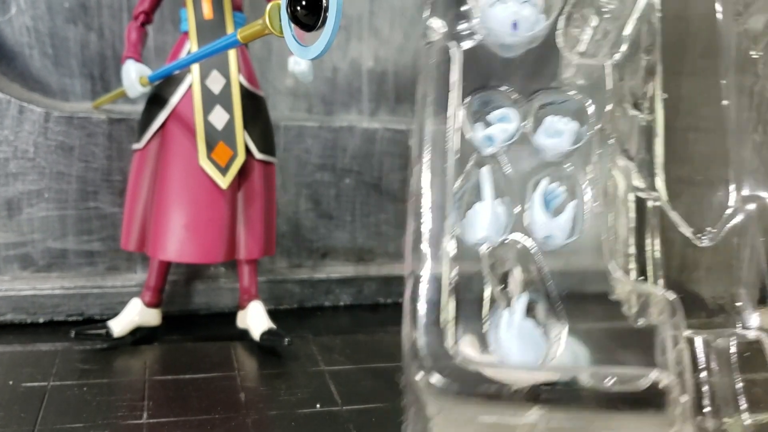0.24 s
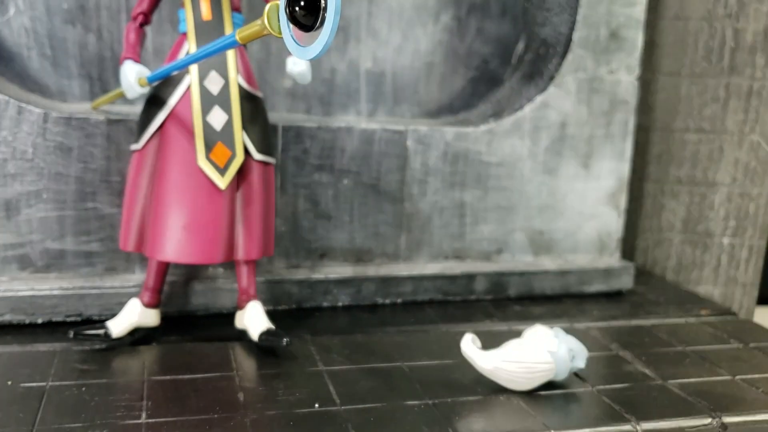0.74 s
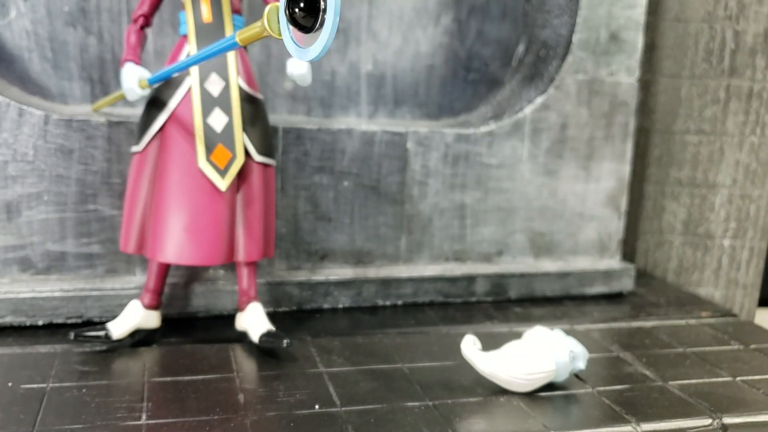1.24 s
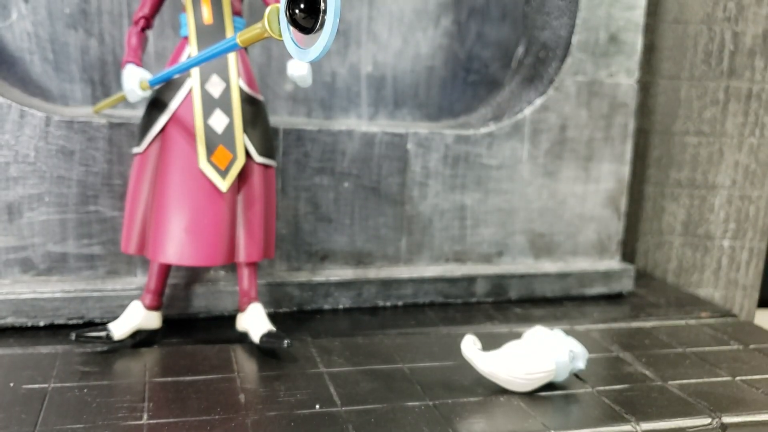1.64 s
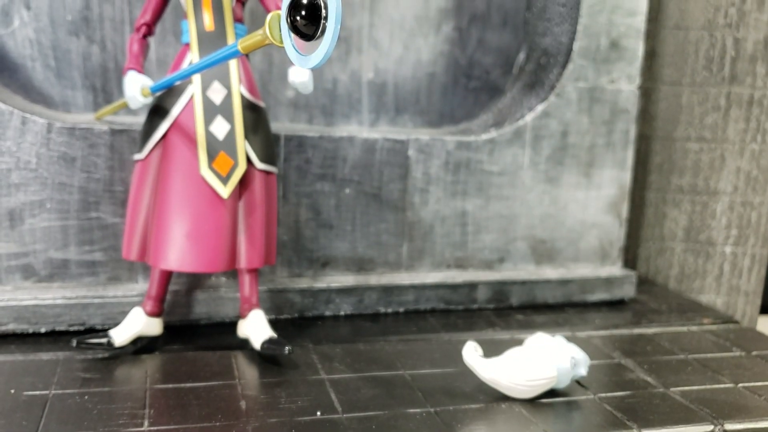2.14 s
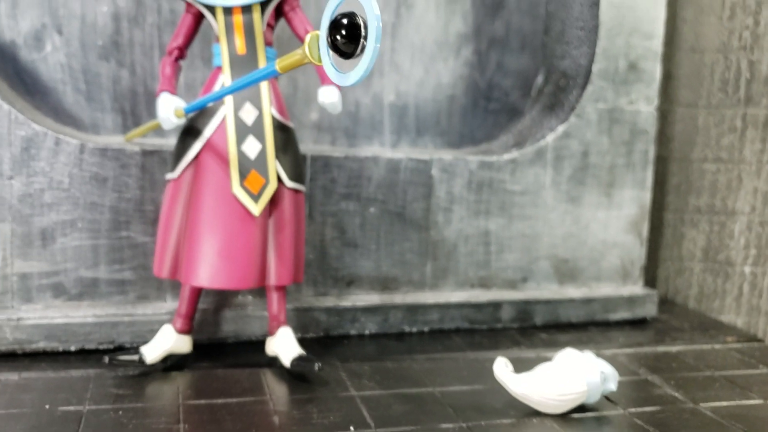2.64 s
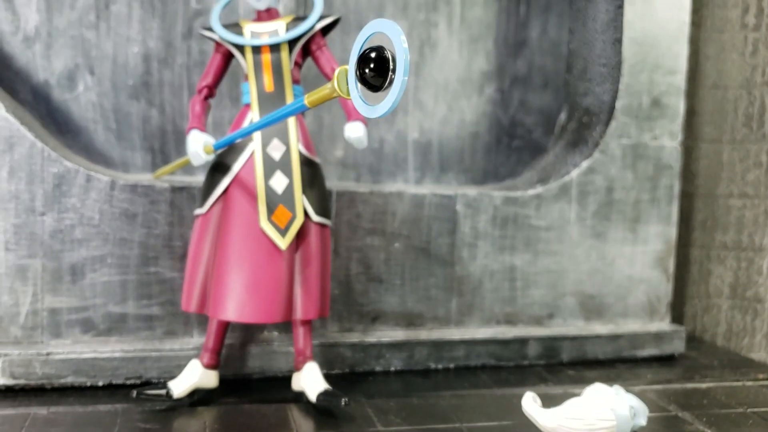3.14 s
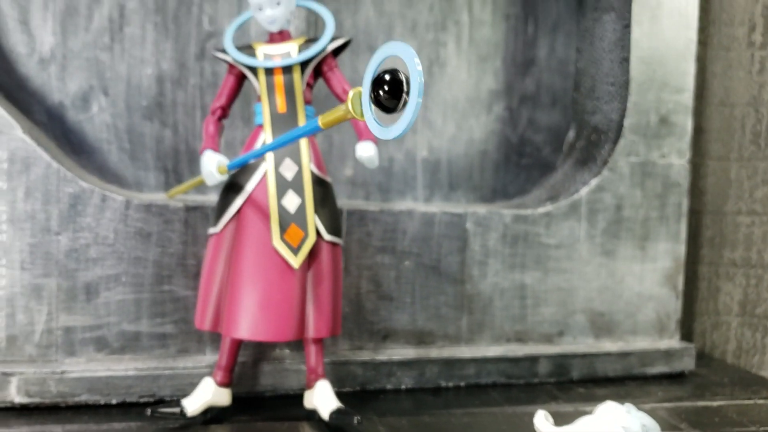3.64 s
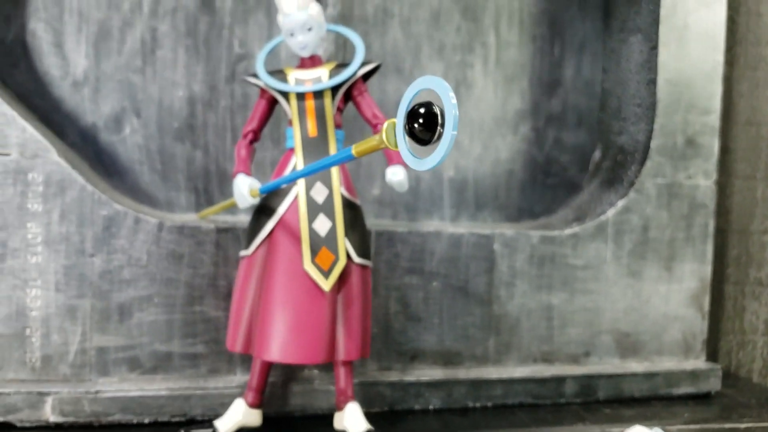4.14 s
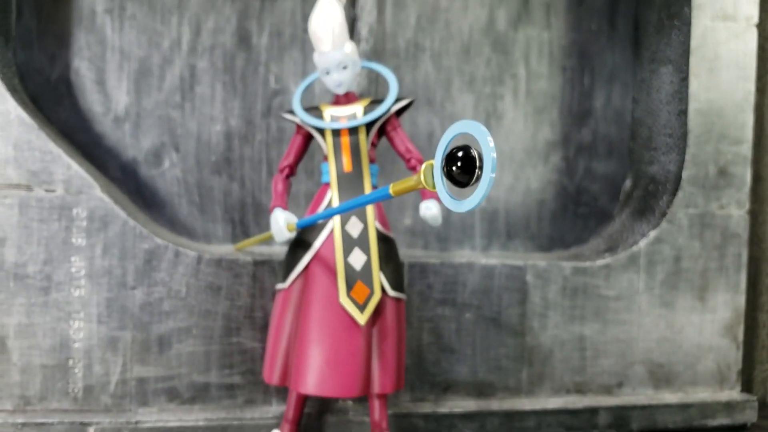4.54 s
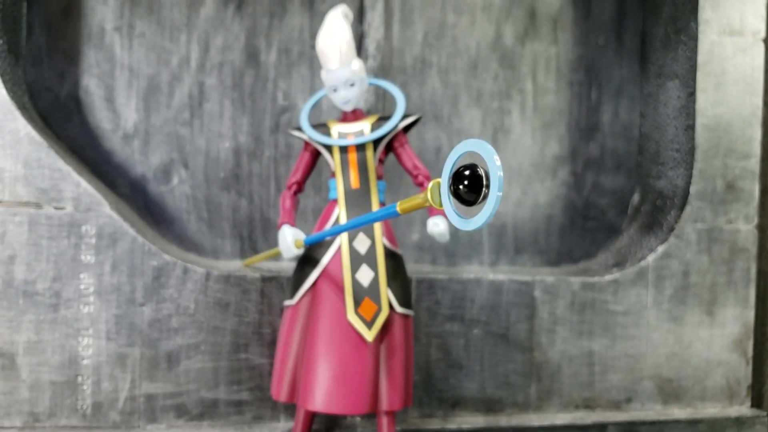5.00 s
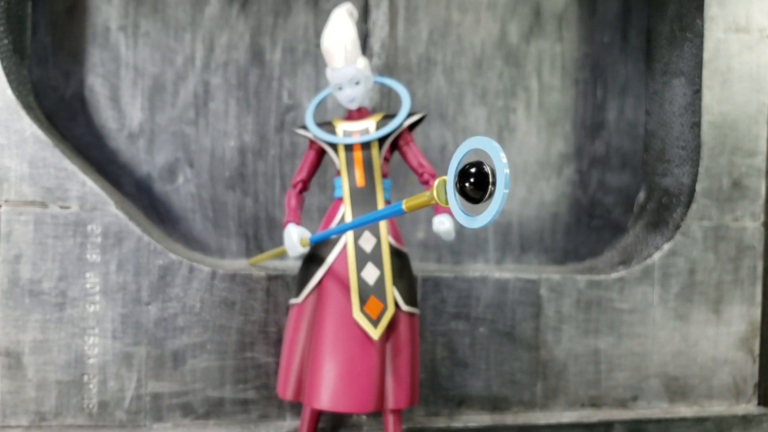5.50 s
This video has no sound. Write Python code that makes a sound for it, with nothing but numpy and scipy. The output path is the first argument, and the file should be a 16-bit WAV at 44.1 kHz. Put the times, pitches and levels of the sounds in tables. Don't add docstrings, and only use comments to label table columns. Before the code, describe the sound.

A quiet small furnished room with low house hum and soft microphone hiss. From about 0.2 s a thin plastic tray on the table, to the right, gives faint ticks, with small crackles near 0.7 and 0.9 s. Between 1.15 and 1.9 s it buckles in a dense, irregular run of bright pops and crinkles with light table thuds; one last weak click comes at 2.1 s. At 2.44 s a distinct hollow knock begins the tilting of a jointed stand: gritty rubbing, a brisk finger scrape at 2.7 s, then scattered ticks and creaks, with a stronger tick at 3.75 s. Around 4.1 s the joint rubs harder, squeaks thinly and catches with a snap. At 4.44 s the stand hits its stop with a loud hard clack, a low thump and brief rattle. Sparse settling ticks and very faint bumps follow until about 5.65 s, very close and dry in stereo.

```python
import sys
import numpy as np
from scipy import signal
from scipy.fft import rfft, irfft
from scipy.io import wavfile
from scipy.ndimage import map_coordinates

SR = 44100
rng = np.random.default_rng(int(sys.argv[2]) if len(sys.argv) > 2 else 0)


def materialize(psi):
    bounded = np.clip(np.atleast_2d(psi).T, -1, 1)
    quanta = np.round(bounded * 32767).astype(np.int16)
    wavfile.write(sys.argv[1], SR, quanta)


def boost(x):
    u = np.asarray(x, float) / 20
    return 10 ** u


N = 254266


def rms_one(x):
    return x / np.sqrt(np.mean(x ** 2) + 1e-30)


def add(out, s, sound):
    i = round(s * SR)
    out[:, i:i + sound.shape[-1]] += sound[..., :N - i]


def colour(x, spectrum, modes=()):
    hz = np.arange(4097) * SR / 8192 + 1
    at_hz, db = np.transpose(spectrum)
    knots_hz = np.r_[at_hz[0] / 2, at_hz, at_hz[-1] * 1.5]
    db = np.interp(np.log(hz), np.log(knots_hz), np.r_[db[0] - 30, db, db[-1] - 30])
    for mode_hz, width_hz, mode_db in modes:
        db = db + mode_db / (1 + (2 * (hz - mode_hz) / width_hz) ** 2)
    cepstrum = irfft(db * np.log(10) / 20)
    cepstrum[1:4096] *= 2
    cepstrum[4097:] = 0
    impulse = irfft(np.exp(rfft(cepstrum))) * np.ones(np.shape(x)[:-1] + (1,))
    return signal.oaconvolve(x, impulse, axes=-1)[..., :N]


def drift(rate_hz):
    r = np.exp(-2 * np.pi * rate_hz / SR)
    settle = 9000
    return rms_one(signal.lfilter([1], [1, -2 * r, r * r], rng.standard_normal(N + settle))[settle:])


def grains(per_s, spread_db, clump_db, alike):
    sizes = boost(spread_db * np.minimum(rng.exponential(1, (3, N)), 4)) * rng.choice([-1, 1], (3, N))
    slips = sizes * (rng.random((3, N)) < per_s / SR) * boost(clump_db * drift(59))
    return np.sqrt(alike) * slips[0] + np.sqrt(1 - alike) * slips[1:]


def swells(s, db, rise_s, fall_s):
    swell_db = 30
    round_top = 0.051
    block = 32
    t = np.arange(0, N + block, block) / SR - np.array(s)[:, None]
    away = np.where(t < 0, -t / np.reshape(rise_s, (-1, 1)), t / np.reshape(fall_s, (-1, 1)))
    away = away + 2 * np.maximum(away - 1, 0) * (t < 0)
    rounded = np.hypot(np.minimum(away, 8), round_top) - round_top
    gain = boost(np.array(db)[:, None] - swell_db * rounded).sum(axis=0)
    return np.interp(np.arange(N) / block, np.arange(len(gain)), gain)


def patchy(x, patch_db, patch_s, patch_hz):
    hz, s, frames = signal.stft(x, SR, nperseg=256)
    places = np.meshgrid(hz / patch_hz, s / patch_s, indexing="ij")
    field = map_coordinates(rng.standard_normal(size=(64, 512)), places, order=1, mode="wrap")
    return signal.istft(frames * boost(patch_db * field), SR, nperseg=256)[1][:, :N]


def ring(hz, t60, contact_s):
    t = np.arange(int(t60 * SR)) / SR
    return np.sin(2 * np.pi * hz * t) * boost(-60 * t / t60) * (1 - np.exp(-t / contact_s)) ** 2


def knocks(rows, overtones, cycles, dull_t60, sharp_t60):
    # f/Hz, level/dB per Hz
    dull_spectrum = [(1300, -4.5), (2100, -1), (3000, -6), (4500, -7)]
    sharp_spectrum = [(4500, -11.5), (6300, 0.5), (8600, -6.5), (11500, -2.5), (15500, -9.5)]
    out, dull, sharp = np.zeros((2, N)), np.zeros((2, N)), np.zeros((2, N))
    t = np.arange(900) / SR
    chance, hiss = rng.uniform(-1.8, 1, size=(60, 2)), rng.standard_normal(size=(60, 2, 900))
    for (s, db, hz, dull_db, sharp_db, *pan_db), loose, noise in zip(rows, chance, hiss):
        sides = boost(sum(pan_db) * np.array([[.5], [-.5]]))
        add(out, s, sides * boost(db) * ring(hz, cycles / hz, 0.0005))
        for (ratio, over_db), off in zip(overtones, loose):
            over_hz = hz * ratio * (1 + 0.14 * off)
            add(out, s, sides * boost(db + over_db) * ring(over_hz, 0.91 * cycles / hz, .0002))
        add(dull, s, sides * boost(dull_db - 60 * t / dull_t60) * (noise[0] + 0.49 * noise))
        add(sharp, s, sides * boost(sharp_db - 60 * t / sharp_t60) * (noise[0] + 0.27 * noise))
    return out + boost(11) * colour(dull, dull_spectrum) + boost(6.0) * colour(sharp, sharp_spectrum)


def strike(out_s, level_db, modes, swing=-1):
    contact_cycles = 0.33
    port_lag_s = .00009 * np.array([[0], [1]])
    out, t = np.zeros((2, N)), np.clip(np.arange(SR // 4) / SR - port_lag_s, 0, None)
    for hz, db, t60, pan_db in modes:
        sides = boost(level_db + db + pan_db * np.array([[.5], [-.5]]))
        way = -swing if hz < 150 else swing
        build = 1 - np.exp(-t * hz / contact_cycles)
        add(out, out_s, way * sides * build * np.sin(2 * np.pi * hz * t) * boost(-60 * t / t60))
    return out


def hand():
    # t/s, rub peak level/dB, rise/s, fall/s
    turns = [(2.452, -42.5, 0.066, 0.25), (2.723, -46, 0.036, 0.11), (2.79, -58.5, 0.022, 0.29),
             (2.98, -54.5, 0.089, 0.11), (3.106, -73, 0.067, 1.5), (3.417, -58, 0.064, 0.09),
             (3.563, -47, 0.057, 0.21), (3.762, -51.5, 0.16, 0.27), (4.02, -55, 0.13, 0.19),
             (4.118, -37, 0.022, .07), (4.17, -51, 0.052, .12), (4.286, -53, 0.093, 0.26),
             (4.425, -50.5, 0.027, .1), (4.658, -63.5, 0.053, 0.44), (5.062, -71, 0.019, 0.24),
             (5.405, -65.5, 0.14, .12)]
    # t/s, hiss peak level/dB, rise/s, fall/s, housing rub level/dB re hiss
    slides = [(2.448, -58, 0.048, 0.41, 0.5), (2.727, -42.5, 0.029, 0.038, 1.5),
              (2.78, -76, 0.062, 0.66, 4), (2.98, -61, 0.051, 0.074, 4), (3.118, -61.5, 0.07, 0.18, -2.5),
              (3.22, -64, 0.093, 0.06, -12.5), (3.52, -66.5, 0.32, 0.68, 1), (3.563, -69.5, 0.072, 0.23, 2),
              (4.025, -60, 0.083, 0.079, -20), (4.118, -49.5, 0.029, 0.086, 2.5),
              (4.286, -68.5, 0.19, 0.29, 2), (5.385, -79, 0.32, 0.26, 2.5)]
    # f/Hz, level/dB per Hz
    joint_spectrum = [(160, -30), (270, -0.5), (377, -11.5), (605, -3), (1030, -11.5), (1290, -4),
                      (1460, -12.5), (2200, -26), (2860, -53.5), (4840, -120)]
    arm_spectrum = [(1900, -5), (2300, -2.5), (2900, 1.5), (3600, -3.5), (4400, -4.5)]
    housing_spectrum = [(4500, -14), (5300, -1), (6100, 0.5), (7200, -3.5), (7900, -17)]
    finger_spectrum = [(4710, -45.5), (8000, -20), (8680, -21), (9920, -10.5), (10700, -5.5), (12800, -2.5),
                       (15200, -1), (16100, -3), (16500, -30.5)]
    # t/s, ring peak level/dB, f/Hz, dull
    # crack level/dB, sharp crack level/dB
    joint_ticks = [(2.422, -43, 735, -66, -75), (2.44, -23, 775, -35, -41), (2.563, -44, 668, -70, -80),
                   (2.687, -47, 1210, -68, -85), (2.716, -36, 1130, -48, -58), (2.925, -63, 1100, -80, -90),
                   (2.945, -50, 1150, -62, -85), (3.108, -56, 900, -70, -90), (3.175, -62, 1097, -59.5, -78),
                   (3.208, -57, 1130, -71, -85), (3.245, -53, 760, -94, -77), (3.271, -55, 834, -85, -77),
                   (3.404, -49, 1210, -69, -80), (3.414, -46, 707, -74, -85), (3.432, -53, 482, -77, -90),
                   (3.525, -51, 1150, -75, -85), (3.554, -44, 660, -61, -80), (3.633, -43.5, 660, -68, -85),
                   (3.722, -48, 650, -72, -85), (3.753, -27, 548, -50.5, -71),
                   (3.828, -36.5, 500, -80, -73.5), (3.893, -48.5, 450, -66, -80),
                   (3.941, -55, 600, -74, -85), (4.05, -46, 800, -77, -85), (4.058, -39.5, 695, -74, -80),
                   (4.07, -47, 800, -72, -83), (4.09, -42.5, 484, -72, -70), (4.107, -34, 510, -60, -60),
                   (4.143, -45, 657, -30, -34), (4.255, -43.5, 395.8, -73, -71),
                   (4.289, -31.5, 503, -68, -78), (4.297, -37.5, 514, -73, -85), (4.337, -45, 660, -63, -85),
                   (4.42, -43, 696, -57, -60),
                   (4.544, -44, 425.5, -79.5, -84), (4.625, -60, 700, -85, -90),
                      (4.652, -44.5, 482, -87, -77), (4.694, -47.5, 452, -71, -66.5),
                      (4.795, -61, 644, -64, -59), (4.86, -59.5, 401, -85, -87),
                      (4.919, -46, 1250, -63, -73), (5.065, -44, 567, -93, -76),
                      (5.403, -57, 1198, -85, -90), (5.434, -56, 900, -89, -88),
                      (5.622, -64, 490, -66, -85), (5.647, -63, 1050, -85, -95),
                      (4.752, -59, 900, -73, -90), (4.781, -58, 900, -73, -90)]
    # t/s, left-right level/dB
    grip_side = [
        (2.44, -8.5),
        (3.2, -22),
        (3.85, 1),
        (4.2, -8.5),
        (4.7, 5),
        (5.1, 2),
        (5.4, -8),
    ]
    # f/Hz, level/dB, t60/s, left-right level/dB
    catch_modes = [(480, -22, 0.014, 1), (660, 0, .022, -4.5), (1180, -7.5, 0.018, -13.5),
                   (1340, -15.5, 0.027, -15.5), (2075, -10.5, 0.0145, -8.5), (2610, -15, 0.017, -10),
                   (3220, -22, 0.018, -3), (4860, -19, .01, 9), (6110, -18.5, .014, 14),
                   (6870, -17, .016, 11), (11400, -22, .003, 9), (14500, -20, .003, 7)]
    release_modes = [(1150, -19, .008, -4), (2680, -10, 0.0043, -7), (5630, -8.5, 0.0044, -9.5),
                     (11500, 2.5, .0018, -15), (14000, -6, .0015, -6)]

    s, db, rise_s, fall_s, housing_db = np.transpose(slides)
    turn = swells(*np.transpose(turns))
    slide = swells(s, db, rise_s, fall_s)
    housing = swells(s, db + housing_db, rise_s, fall_s)
    gritty = grains(per_s=2300, spread_db=2.5, clump_db=3.0, alike=0.29)
    smooth = grains(per_s=11000, spread_db=2.5, clump_db=2.0, alike=0.29)
    smooth = patchy(smooth, patch_db=3.5, patch_s=.06, patch_hz=600)

    rubs = turn * rms_one(colour(gritty, joint_spectrum)) * boost([[-1.5], [1.5]])
    both = turn * (housing / (turn + 1e-9)) ** .6
    rubs += boost(-5.5) * both * rms_one(colour(smooth, arm_spectrum))
    rubs += housing * rms_one(colour(smooth, housing_spectrum))
    rubs += boost(1.0) * slide * rms_one(colour(smooth, finger_spectrum))

    ticks = [(*row, np.interp(row[0], *np.transpose(grip_side))) for row in joint_ticks]
    ticking = knocks(ticks, [(1.6, -5.5), (2.3, -11.5)], cycles=14.0, dull_t60=0.013, sharp_t60=0.0039)
    snaps = strike(4.1432, -13.5, catch_modes, swing=1) + strike(5.3738, -31, release_modes)
    return rubs + snaps + ticking


def clack():
    # f/Hz, level/dB, t60/s, left-right level/dB
    stand_modes = [(780, -11, 0.02, -5), (910, -9, 0.025, -6), (1030, -9, 0.028, -7), (1308, -12, .02, -6),
                   (1090, -5, 0.02, -2), (1690, -10, .025, -2), (2301, -13, 0.023, 5), (2756, -4, .025, 8),
                   (3004, -7, 0.025, 3), (5570, -13, 0.0085, 8), (6220, -10.5, 0.026, 9)]
    foot_modes = [(70, -15, 0.088, 1), (109, -9, .13, 1.5), (170, -12, 0.043, 2), (211.8, -3, .09, 2),
                  (322, -10.5, 0.057, -2), (415, -13.5, .04, -2), (485.5, -18, .1, -4), (604, -14, .03, -4),
                  (694, -9, 0.033, -5)]
    # f/Hz, level/dB per Hz
    crack_spectrum = [(300, -9), (1000, 1), (2800, 1), (4300, -5), (6200, 3), (8600, -16), (12500, -11),
                      (15500, -5.5)]
    rattle_spectrum = [(300, -6), (1000, 0), (2800, -1.5), (4300, -4.5), (6200, -1.5), (8600, -15),
                       (12500, -14), (15500, -12)]
    clack_s, clack_db, foot_lag_s = 4.4397, -9, .0019
    crack, rattle, t = np.zeros((2, N)), np.zeros((2, N)), np.arange(SR // 4) / SR
    noise = rng.standard_normal((2, 2, len(t)))
    add(crack, clack_s, boost(clack_db + 1.5 - 60 * t / .014) * boost([[5], [-5]]) * noise[0])
    add(rattle, clack_s, boost(clack_db - 23.0 - 60 * t / 0.2) * noise[1])
    stand = strike(clack_s, clack_db + 2.0, stand_modes)
    foot = strike(clack_s + foot_lag_s, clack_db + 2.5, foot_modes, swing=1)
    return stand + foot + colour(crack, crack_spectrum) + colour(rattle, rattle_spectrum)


def tray():
    # t/s, crackle peak level/dB, rise/s, fall/s, bright part level/dB re low part
    pushes = [(0.672, -59, .002, 0.086, -7), (0.938, -62, 0.0023, 0.19, -13),
              (1.159, -37.5, 0.0024, 0.11, -8.5), (1.372, -43, 0.14, 0.1, -13.5),
              (1.386, -36.5, 0.0087, 0.13, -6.5), (1.488, -51, 0.26, 0.02, -18),
              (1.659, -72, 0.41, 0.18, 1.5), (1.714, -56, 0.09, 0.0035, -3.5),
              (1.724, -32, 0.0012, 0.1, -8), (1.825, -37.5, 0.0021, 0.031, -7.5),
              (1.883, -40.5, 0.0016, 0.04, -8.5), (1.907, -54, 0.057, 0.077, -5),
              (2.138, -66, 0.049, 0.068, -10.5)]
    # t/s, ring peak level/dB, f/Hz, dull crack level/dB, sharp crack level/dB
    snaps = [(0.199, -65, 603, -77, -94), (0.278, -59.5, 620, -86, -90), (0.33, -64, 530, -71, -88),
             (0.673, -48, 644, -58, -80), (0.684, -56, 1200, -66, -85), (0.868, -64.5, 615, -87, -79),
             (0.942, -49, 1190, -52, -69), (0.99, -60, 700, -70, -88), (1.16, -40.5, 452, -49, -53),
             (1.175, -45, 450, -39.5, -42.5), (1.196, -40, 900, -46, -51), (1.235, -52, 690, -63, -75),
             (1.247, -49, 651, -58, -72), (1.256, -50, 700, -56, -70), (1.295, -50, 864, -60, -74),
             (1.312, -39, 710, -56, -72), (1.33, -44, 600, -50, -64), (1.343, -40, 802, -48, -62),
             (1.355, -39.5, 696, -44, -57), (1.389, -23.5, 860, -37.5, -47),
             (1.401, -25.5, 900, -62, -40.5), (1.417, -36, 1100, -46, -47), (1.433, -38, 1100, -42, -56),
             (1.476, -36.5, 790, -47, -62), (1.511, -49, 1600, -70, -85), (1.682, -39, 837, -47, -48),
             (1.723, -31, 480, -32, -52), (1.732, -35, 387, -31.5, -33), (1.762, -38, 900, -49, -56),
             (1.776, -36, 800, -43, -54), (1.823, -30, 724, -35, -73), (1.883, -31, 572, -38.5, -67),
             (1.901, -30, 623, -42.5, -45), (2.13, -53, 632, -83, -59.5)]
    # f/Hz, level/dB per Hz
    low_spectrum = [(190, -33), (330, -9), (431, -10), (844, -7), (978, -12), (1230, 0.5), (1400, -4),
                    (3500, -25), (4550, -36.5), (7700, -120)]
    high_spectrum = [(1470, 5), (2500, -37), (2660, -3), (3240, -13.5), (4110, -7.5), (7370, -13.5),
                     (8700, -24), (14800, -18.5), (15900, -65), (16500, -36)]
    # f/Hz, width/Hz, level/dB
    sheet_modes = [(450, 30, 5), (690, 62, 7), (870, 55, 7.5), (1374, 490, -2), (2760, 290, -3.5)]
    s, db, rise_s, fall_s, bright_db = np.transpose(pushes)
    pops = grains(per_s=3000, spread_db=3.0, clump_db=3.0, alike=0.26)
    low = rms_one(colour(pops, low_spectrum, sheet_modes)) * swells(s, db, rise_s, fall_s)
    high = rms_one(colour(pops, high_spectrum)) * swells(s, db + bright_db, rise_s, fall_s * 0.99)
    snapping = knocks(snaps, [(1.5, -1.5), (2.3, -6.5)], cycles=19.8, dull_t60=0.027, sharp_t60=0.0069)
    sheet = boost(1.5) * (low + high) + snapping
    return np.array([np.roll(sheet[0], 14) * boost(-2.5), sheet[1]])


def squeaks():
    # start/s, end/s, f/Hz, spread/Hz, level/dB
    slips = [(2.46, 2.6, 2850, 150, -62), (1.45, 1.485, 2900, 200, -55), (3.545, 3.61, 2800, 300, -60),
             (4.24, 4.32, 6300, 250, -66), (3.7, 3.86, 5800, 190, -70.5), (4.09, 4.14, 6100, 500, -50),
             (5.29, 5.34, 5800, 700, -76), (2.496, 2.6, 9500, 60, -75), (2.71, 2.751, 10260, 213, -51.5),
             (3.085, 3.165, 12300, 600, -56), (3.587, 3.674, 5140, 91, -65), (3.975, 4.062, 5830, 410, -55),
             (4.1, 4.137, 10100, 200, -48), (4.098, 4.14, 12000, 180, -49.5),
             (4.103, 4.135, 13800, 500, -43), (4.261, 4.321, 2930, 110, -68)]
    out = np.zeros((2, N))
    for start_s, end_s, hz, spread_hz, db in slips:
        t = np.arange(round((end_s - start_s) * SR)) / SR
        slow = signal.butter(2, spread_hz, fs=SR, output="sos")
        flutter = rms_one(signal.sosfilt(slow, rng.standard_normal((2, len(t) + 2000)))[:, 2000:])
        shape = boost(db + 3) * np.sqrt(np.hanning(len(t)))
        add(out, start_s, shape * flutter * np.sin(2 * np.pi * hz * t))
    return out


def whistles():
    # start/s, end/s, first f/Hz, last f/Hz, level/dB
    glides = [(1.564, 1.69, 3130, 3080, -75), (1.59, 1.685, 1570, 1610, -72),
              (2.57, 2.685, 6620, 6400, -69), (2.585, 2.7, 2460, 2340, -68), (2.75, 2.86, 2950, 2850, -74),
              (4.103, 4.14, 1220, 1180, -47), (4.105, 4.138, 530, 500, -44),
              (3.99, 4.04, 1250, 1200, -59.5), (5.35, 5.43, 1260, 1100, -76), (5.39, 5.45, 690, 660, -69),
              (5.235, 5.3, 1100, 1280, -79)]
    waver_share, swell_db = .02, 4.5
    out, waver, swell = np.zeros((2, N)), drift(90), drift(160)
    for start_s, end_s, first_hz, last_hz, db in glides:
        now = slice(round(start_s * SR), round(end_s * SR))
        hz = np.linspace(first_hz, last_hz, len(waver[now])) * (1 + waver_share * waver[now])
        shape = np.sqrt(np.hanning(len(hz))) * boost(db + 3 + swell_db * swell[now])
        out[:, now] += shape * np.sin(2 * np.pi * np.cumsum(hz) / SR)
    return out


def bumps():
    # t/s, peak level/dB, f/Hz
    rocks = [
        (1.803, -53, 75.7),
        (2.473, -30.5, 201),
        (2.488, -29.5, 202),
        (2.745, -36, 183),
        (3.559, -36.5, 222),
        (3.687, -38, 170),
        (4.785, -42, 72.5),
        (5.271, -48, 60.2),
        (5.648, -44.5, 75.2),
    ]
    out = np.zeros((2, N))
    for s, db, hz in rocks:
        add(out, s, boost(db + 3.0) * ring(hz, 0.057 + 3.2 / hz, 0.0031))
    return out


def rumble():
    # t/s, peak level/dB, fall/s
    jolts = [(1.165, -43, 0.18), (1.341, -43.5, 0.17), (1.471, -41.5, 0.041), (1.73, -42, 0.31),
             (2.13, -56, 0.19), (2.438, -41, 0.23), (2.74, -53, 0.48), (3.56, -48.5, 0.53),
             (4.1, -51, 0.47), (4.443, -36.5, .1), (4.79, -55.5, .13), (5.66, -64.5, .25)]
    # t/s, level/dB
    tremor = [
        (1.1, -88),
        (1.3, -72),
        (2.3, -69),
        (2.75, -57.5),
        (3.5, -53),
        (4.3, -56.5),
        (4.7, -61.5),
        (5.43, -61.5),
        (5.6, -66),
    ]
    # f/Hz, level/dB per Hz
    thud_spectrum = [(12, -41), (20, -4), (34, 5), (54, 8), (123, 6), (166, -2), (198, 1), (239, -8),
                     (336, -16.5), (366, -19.5), (400, -18.5), (520, -39.5), (880, -120)]
    # f/Hz, level/dB per Hz
    hum_spectrum = [(15, -50.5), (25, -20), (75, -0.5), (113, -14.5), (146, -6), (167, -30), (260, -36),
                    (340, -59), (570, -120)]
    s, db, fall_s = np.transpose(jolts)
    tremor_db = np.interp(np.arange(N) / SR, *np.transpose(tremor))
    shaking = rms_one(colour(grains(per_s=1200, spread_db=1.5, clump_db=2.5, alike=0.75), thud_spectrum))
    hum = rms_one(colour(grains(per_s=2000, spread_db=0.5, clump_db=1.5, alike=0.8), hum_spectrum))
    rise_s = 0.022
    return (boost(tremor_db) + swells(s, db, rise_s, fall_s)) * shaking + boost(-69) * hum


def room(x):
    # f/Hz, t60/s
    decay = [(150, 0.22), (600, 0.13), (2500, 0.12), (7000, 0.031), (14000, 0.014)]
    t = np.arange(int(.3 * SR)) / SR
    tail = 0
    for hz, t60 in decay:
        band = signal.butter(1, [hz / 2, min(hz * 2, .45 * SR)], "band", fs=SR, output="sos")
        noise = rms_one(signal.sosfilt(band, rng.standard_normal((2, len(t)))))
        tail = tail + noise * np.sqrt(hz) * boost(-60 * t / t60)
    tail = tail * (t > .004) / np.sqrt(np.sum(tail ** 2) / 2)
    return signal.oaconvolve(x, tail, axes=-1)[:, :N]


def amplifier_hiss():
    # f/Hz, level/dB per Hz
    hiss_spectrum = [(170, -28.5), (280, -3), (394, -11), (539, -8), (737, -11), (1060, -9.5), (3710, -15),
                     (7170, -18), (8100, -26.5), (12100, -16.5), (15100, -12.5), (16500, -29)]
    return boost(-80.5) * rms_one(colour(rng.standard_normal((2, N)), hiss_spectrum))


def scene():
    grip, stop, sheet = hand(), clack(), tray()
    wet = room(boost(-15.5) * grip + boost(-12.0) * stop + boost(-8.5) * sheet)
    contacts = squeaks() + whistles() + bumps()
    return grip + stop + sheet + wet + contacts + rumble() + amplifier_hiss()


def top_cut(x):
    return signal.sosfilt(signal.butter(12, 16850, fs=SR, output="sos"), x)


def record(dry):
    notch_hz, notch_width_hz, notch_depth = 8510, 700, 0.52
    thin = signal.sosfilt(signal.butter(2, 45, "high", fs=SR, output="sos"), dry)
    notch = signal.lfilter(*signal.iirpeak(notch_hz, notch_hz / notch_width_hz, fs=SR), thin)
    rounded = np.tanh(thin - notch_depth * notch)
    cut = signal.sosfilt(signal.cheby2(10, 40, 16000 * 1.04, fs=SR, output="sos"), rounded)
    return top_cut(cut)


dry = scene()
out = record(dry)
materialize(out)
```